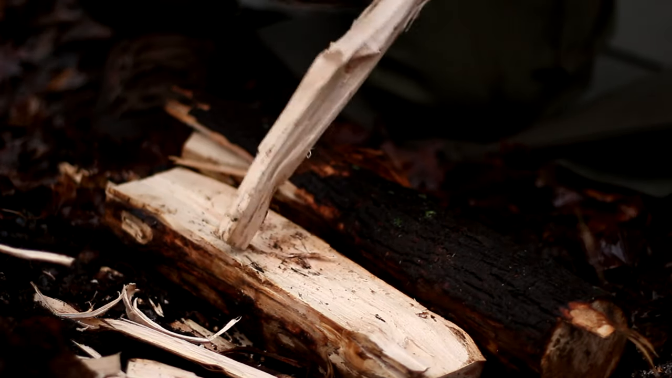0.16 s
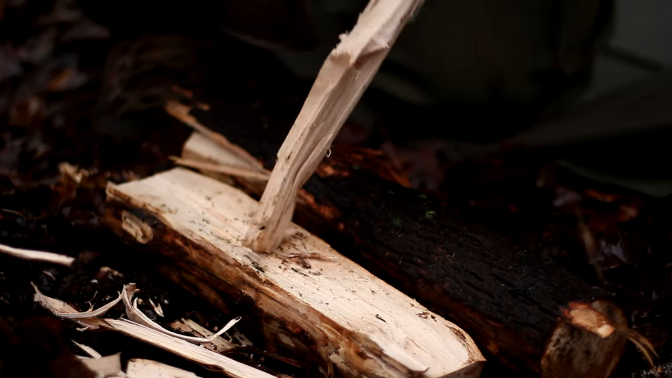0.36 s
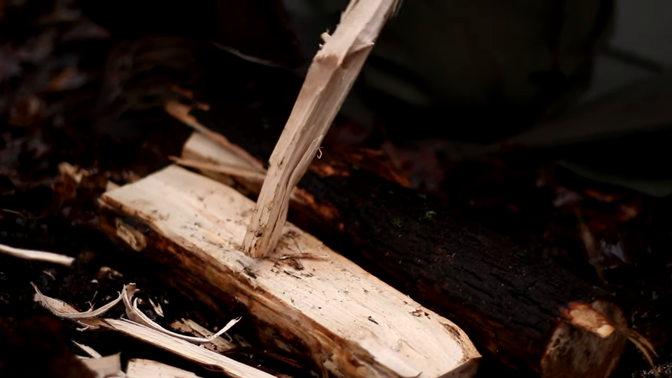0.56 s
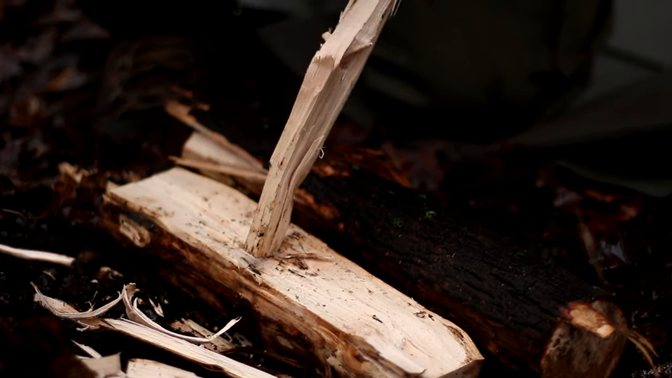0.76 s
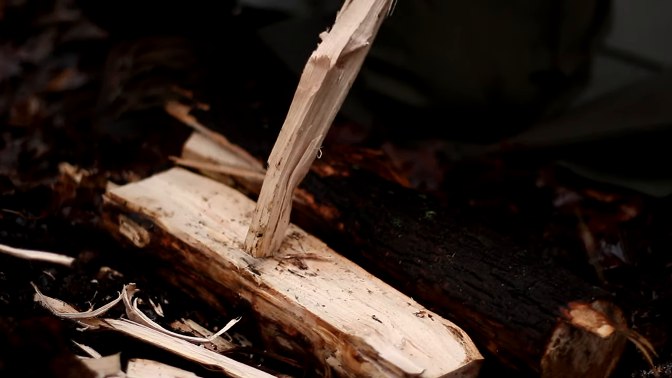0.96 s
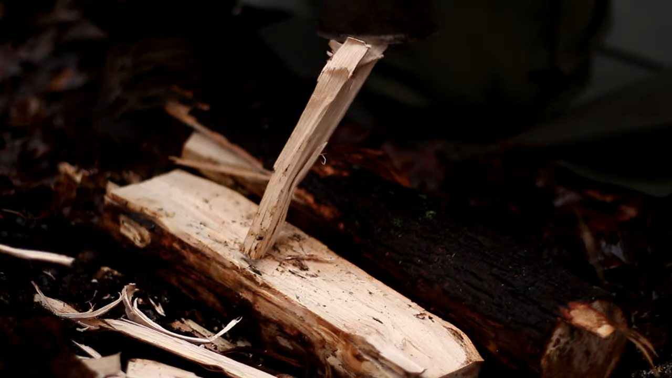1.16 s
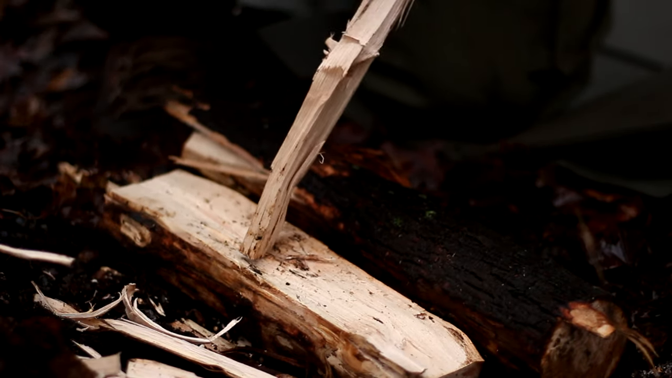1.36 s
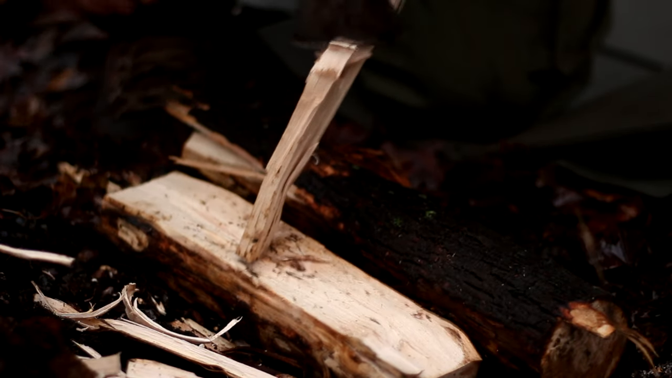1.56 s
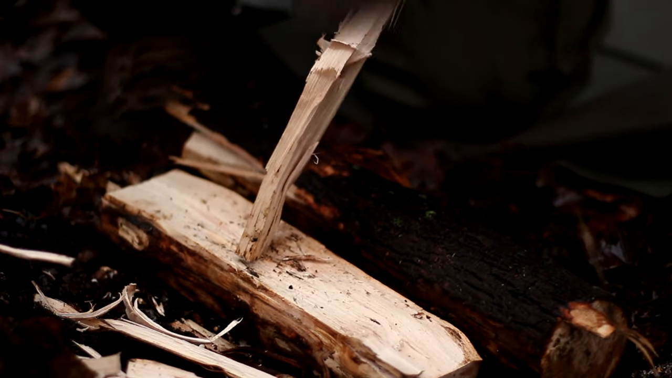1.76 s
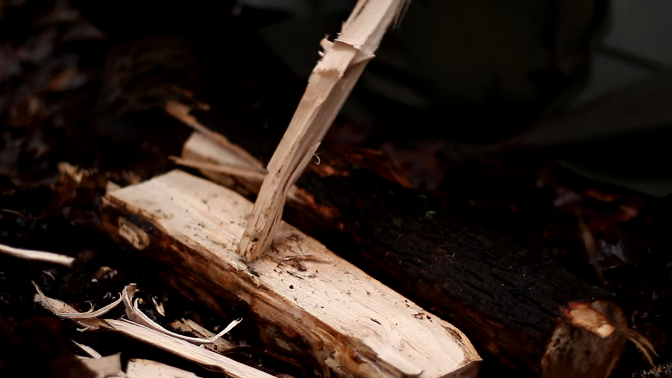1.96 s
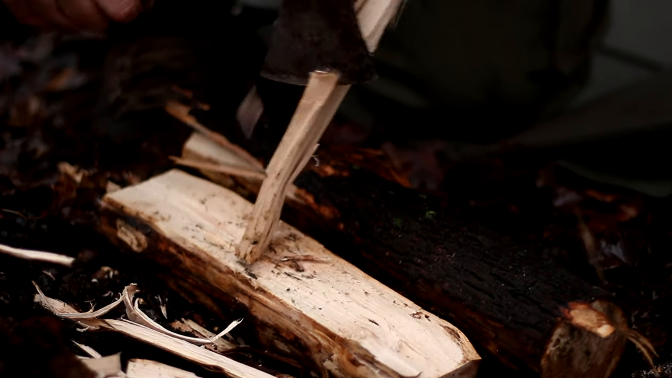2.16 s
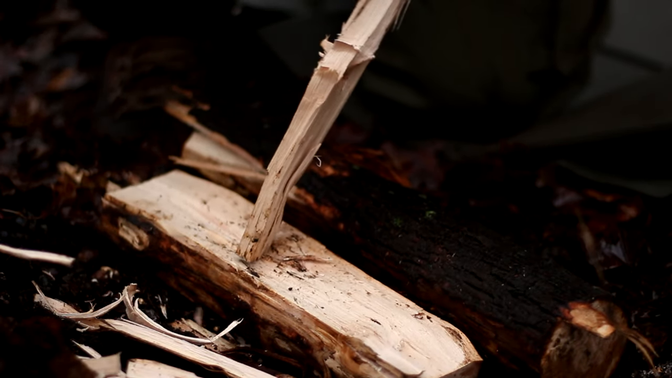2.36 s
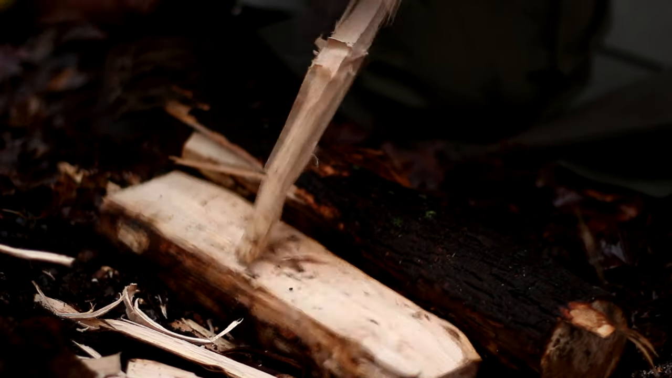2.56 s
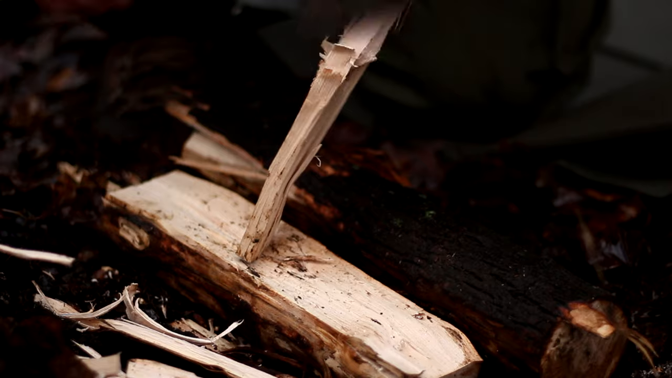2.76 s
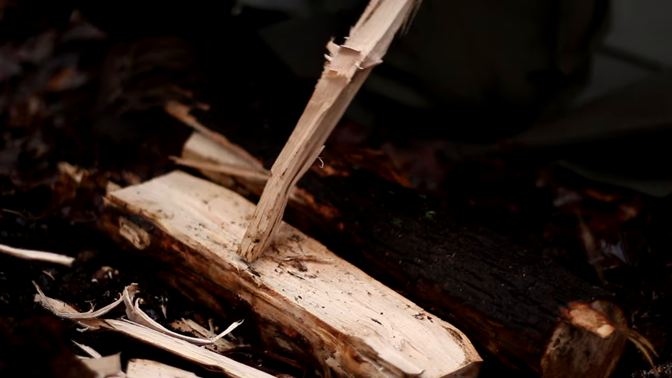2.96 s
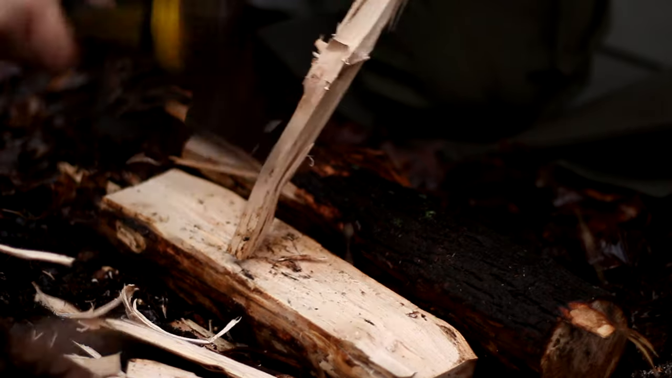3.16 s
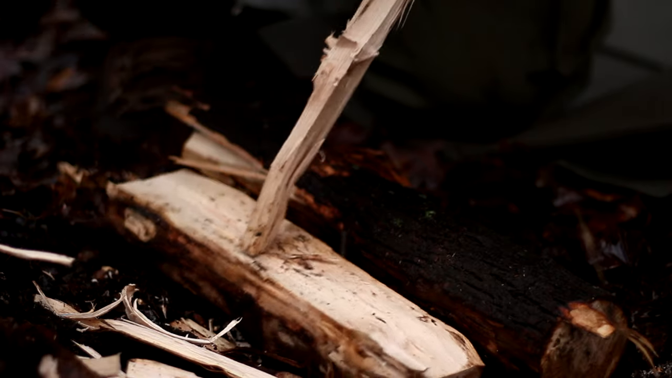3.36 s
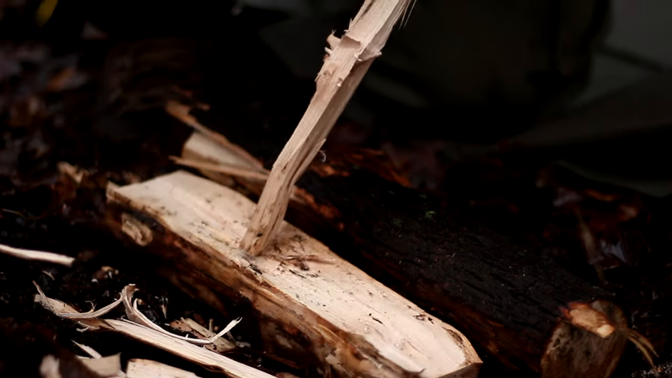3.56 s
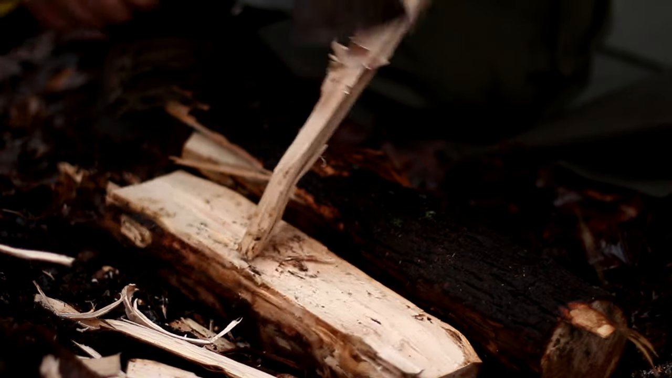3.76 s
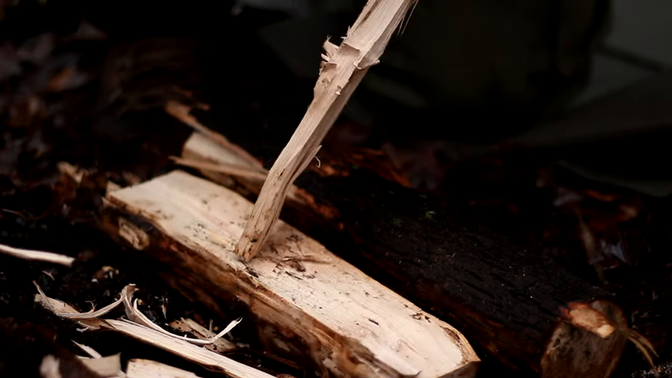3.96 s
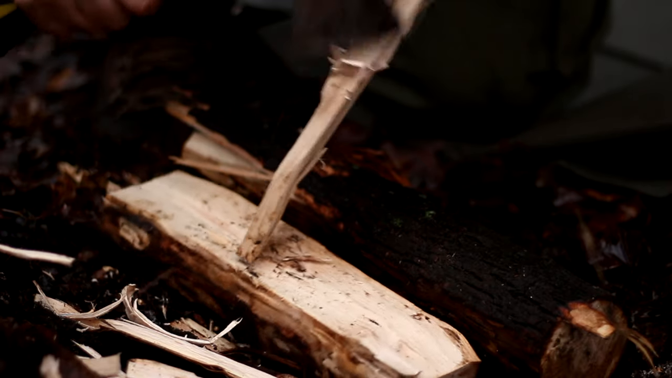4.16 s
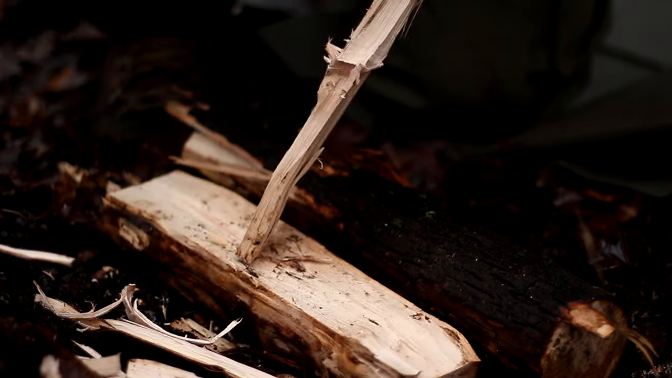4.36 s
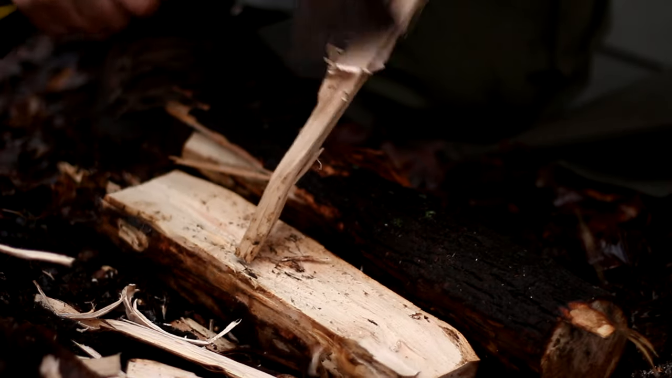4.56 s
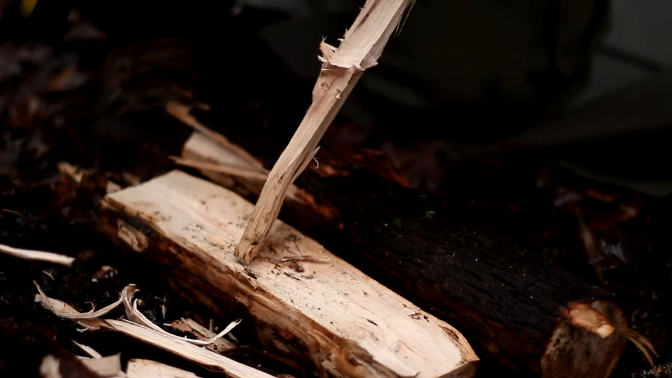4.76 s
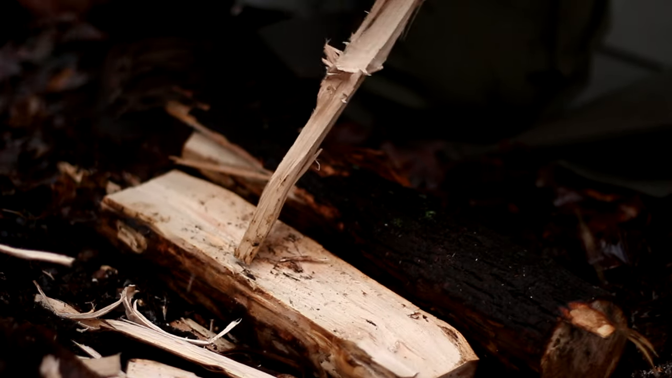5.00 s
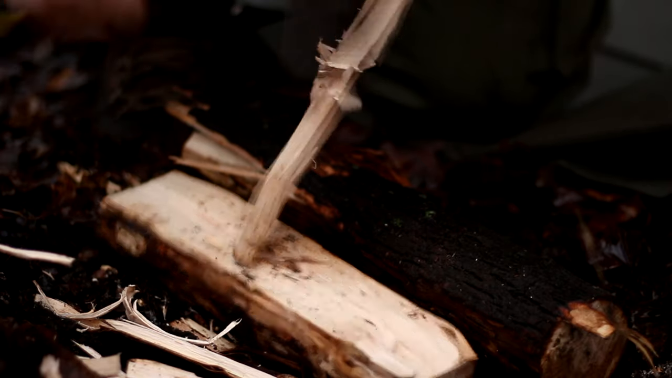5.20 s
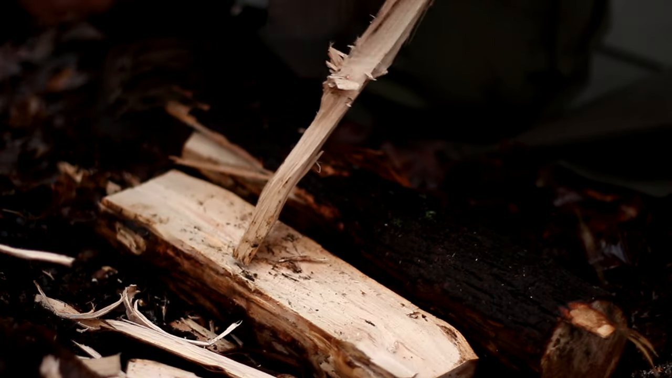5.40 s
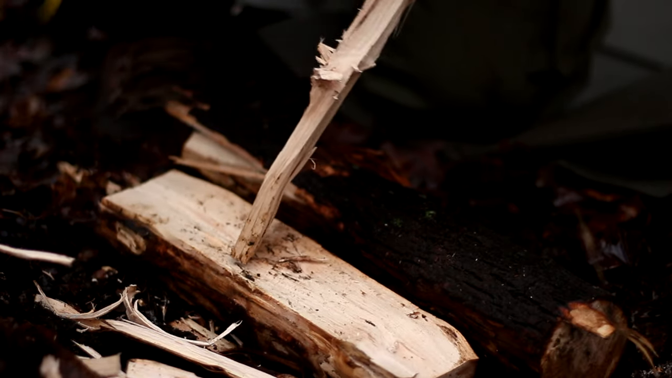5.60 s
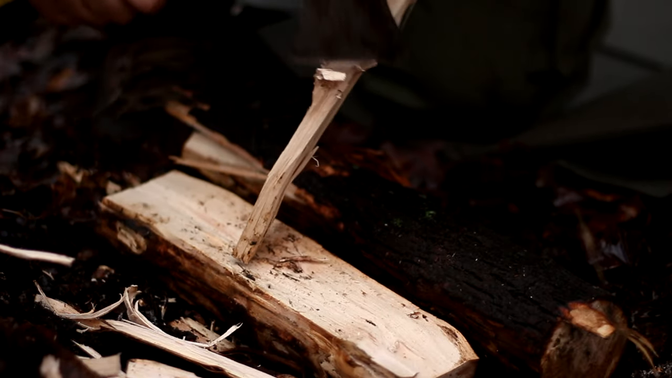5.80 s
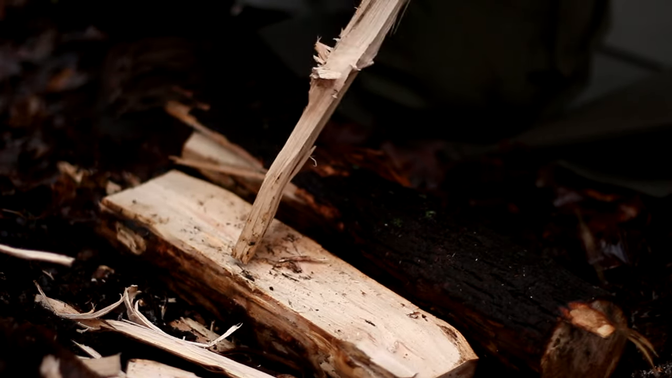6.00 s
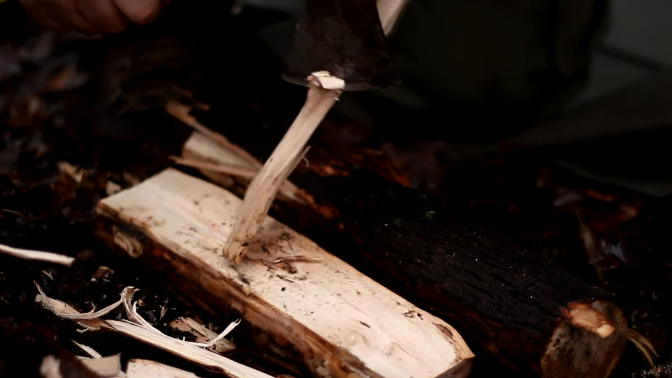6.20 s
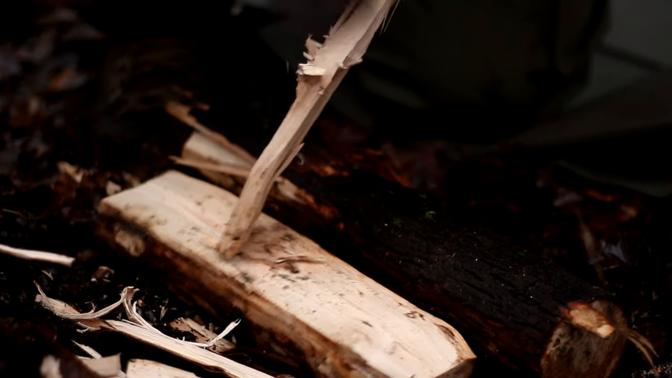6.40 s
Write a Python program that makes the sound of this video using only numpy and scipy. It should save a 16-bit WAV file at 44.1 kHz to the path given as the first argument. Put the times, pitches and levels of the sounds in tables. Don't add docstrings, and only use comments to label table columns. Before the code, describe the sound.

Close outdoor wood chopping: the tail of an earlier blow fades under a faint cloth rustle, then steady hatchet blows run to the end. Each is a hard woody crack with tearing splinters, a tiny bright blade ring and a dull log thump. Small ticks, rasps and one clattering chip fill the gaps over distant traffic rumble and light hiss. The loud hits clip and duck, with little reverberation.

```python
import sys
import numpy as np
from scipy import signal
from scipy.fft import rfft, irfft, next_fast_len
from scipy.io import wavfile
from scipy.ndimage import map_coordinates

SR = 44100
rng = np.random.default_rng(int(sys.argv[2]) if len(sys.argv) > 2 else 0)


def generate_wav(sig):
    pcm = np.round(np.clip(np.atleast_2d(sig).T, -1, 1) * 32767).astype(np.int16)
    wavfile.write(sys.argv[1], SR, pcm)


def undo_db(level):
    steps = np.asarray(level, float) / 20
    return 10 ** steps


N = 284004

# freq_hz, density_db_per_hz
RUMBLE_SPECTRUM = [(12, -34.5), (20, -0.5), (86, 3.5), (123, -7.5), (160, -8.5), (225, -17.5), (285, -25),
                   (311, -29.5), (400, -34), (520, -49.5), (880, -120)]
# freq_hz, density_db_per_hz
AIR_SPECTRUM = [(120, -23.5), (200, -7), (528, -11), (650, -12.5), (968, -17), (1150, -13.5), (2360, -18),
                (9000, -25), (11700, -44.5), (19800, -120)]
# middle_s, half_length_s, level_db
SOFT_SWELLS = [
    (0.051, .12, -52.5),
    (.86, .14, -60),
    (1.092, .03, -55),
    (3.38, .16, -59),
    (3.681, .014, -53),
    (5.597, 1.3, -63),
]
# freq_hz, density_db_per_hz
CLOTH_SPECTRUM = [(240, -51.5), (400, -27), (457, -10.5), (683, -8), (962, -15.5), (1690, -10.5),
                  (14000, -23)]
# level_under_blow_db, t60_s
TRUNK_DECAYS = [(-28.5, 0.24), (-43.5, 0.72)]
# freq_hz, density_db_per_hz
TRUNK_SPECTRUM = [(150, -20), (600, -11), (1200, -2), (1600, -3.5), (1900, 0.5), (2300, -3.5), (3100, -4),
                  (3500, -1.5), (4000, -3), (4900, -6.5), (5800, -6), (6750, -7), (8000, -9), (16000, -22)]
# start_s, peak_db,
# pitch_hz
SPLINTER_TICKS = [(.36, -49.5, 4500), (.684, -42.5, 3460), (.73, -51, 7930), (.936, -53, 8500),
                  (1.289, -43, 10200), (1.888, -50, 8760), (2.338, -38.5, 10030), (2.377, -37.5, 9800),
                  (2.478, -44, 4500), (2.87, -55, 13000), (3.465, -47, 8000), (3.471, -48, 8000),
                  (3.684, -40, 4500), (3.7079, -6, 6000), (3.839, -34, 6600), (4.188, -30.5, 9900),
                  (4.28, -46.5, 9600), (5.381, -35, 12500)]
# start_s, peak_db, pitch_hz
BLADE_RASPS = [(1.836, -38, 11500), (2.348, -44.5, 4000), (2.358, -39.5, 11000), (2.363, -41.5, 4500),
               (3.151, -25, 3480), (3.248, -51, 12100), (3.296, -43, 3020), (3.302, -47, 9000),
               (3.666, -44, 3980), (3.675, -45, 4500), (3.801, -38, 6700), (4.218, -35, 8900),
               (4.23, -41.5, 10000), (4.622, -34, 8400), (4.635, -38, 7750), (4.995, -37, 8100),
               (5.009, -41, 10000), (5.392, -31.5, 11500), (5.4, -43, 12000), (5.841, -41, 9000),
               (5.855, -44, 11000)]
# start_s, level_db
BLADE_PINGS = [
    (1.823, -46),
    (1.834, -45),
    (2.348, -42),
    (2.362, -40),
    (3.165, -39),
    (4.23, -43),
    (4.635, -55),
    (5.009, -54),
    (5.396, -48),
]
BLOW_S = [1.1008, 1.6394, 2.1479, 2.6584, 3.1235, 3.7085, 4.1282, 4.5423, 4.9178, 5.3045, 5.742, 6.155]
# knock_db, knock_hz, log_body_db, thump_db
BLOWS = [(1, 1410, -16, -26.5), (-0.5, 1260, -29, -22), (1.5, 1540, -30, -28.5), (0, 1300, -13, -24.5),
         (-2, 1620, -26.5, -25.5), (-16, 2400, -8, -25), (3, 1430, -20, -26), (1, 1400, -23, -25),
         (2, 1410, -16, -24.5), (-0.5, 1460, -10, -22), (4.5, 1815, -34, -21.5), (0.5, 1380, -31, -21)]
# freq_hz, level_db, t60_s
STICK_MODES = [(1900, -9.5, 0.05), (1240, -12, 0.045), (2300, -12.5, 0.023)]
# freq_hz, level_db, t60_s, arrival_s
LOG_MODES = [(86.6, 1, 0.085, 0.0027), (53, -19.5, 0.21, 0.021), (147.4, -7.5, 0.062, 0.00058),
             (221.8, -4, 0.045, 0.00052)]
# strongest_colour_hz, fibre_burst_db, slow_tearing_db
CRACKS = [(3700, -4.5, -5.5), (4160, -5.5, -4), (5450, -16.5, -3.5), (5134, -9.5, -5), (5040, -6.5, -2.5),
          (5000, -9, -2), (6000, -8, -5), (4920, -4, -2), (5500, -0.5, -0.5), (5200, -9.5, -5),
          (5000, -5, -1.5), (4500, -4, -2)]
# freq_hz, width_hz, level_db
BLADE_MODES = [(3585, 390, -4), (5005, 440, -1), (5640, 450, -4), (6970, 99, -1.5), (8620, 1100, -1.5),
               (9470, 63, 1), (10510, 220, 7.5), (12500, 170, 3), (14680, 520, -25.5)]
# freq_hz, density_db_per_hz
SPLINTER_SPECTRUM = [(300, -33), (700, -14), (1480, -2.5), (1950, -2), (2700, -11), (3500, -6),
                     (7000, -8.5), (16000, -21)]
# start_s, level_db
BARK_TOUCHES = [
    (2.1467, -26),
    (3.1222, -15),
    (3.7062, -26),
    (4.1268, -28),
    (5.303, -24),
    (5.7408, -34),
]
# start_s, peak_db, pitch_hz
FIBRE_SNAPS = [(1.107, -6, 2196), (1.1123, -7, 2130), (1.822, -45.5, 1660), (2.1535, -9.5, 6500),
               (2.1551, -5.5, 7980), (2.6613, -1.5, 1800), (2.6628, -6, 6870), (2.6725, -9.5, 2300),
               (2.676, -16, 2500), (2.682, -18.5, 2100), (3.128, -13, 9300), (3.1398, -16, 10800),
               (3.1507, -24.5, 7000), (3.152, -16, 2580), (3.671, -43, 1950), (3.679, -41, 1900),
               (3.688, -37, 480), (3.7107, 0, 3350), (3.72, -10.5, 1990), (4.1313, -9, 1900),
               (4.601, -37, 2110), (5.361, -34.5, 2000), (5.749, -8.5, 2000), (6.1589, -2.5, 392)]
# start_s, level_db
CHIP_LANDINGS = [
    (3.1752, 2.5),
    (3.689, -38),
]
# freq_hz, level_db, t60_s
CHIP_MODES = [(480, -7, 0.0087), (747, 4.5, 0.0097), (1140, 1.5, 0.012), (1820, -3.5, 0.02),
              (3000, -16, .012), (3700, -22, .012)]
# freq_hz, density_db_per_hz
HISS_SPECTRUM = [(20, 0.5), (100, 4), (400, 0), (15000, -1)]

RUMBLE_DB, AIR_DB, HISS_DB = -50, -61, -57.5
DRONE_DB, DRONE_FADE_DB_PER_S = -58.5, -1.5
EARLIER_BLOW_S, EARLIER_BLOW_DB = .1, -8.5
TICK_T60_S, TICK_RISE_S = 0.0073, 0.00014
RASP_T60_S, RASP_RISE_S = 0.029, 0.0016
CRACK_LAG_S = .0011
SNAP_CYCLES, SNAP_CYCLES_POWER = 8.2, 0.75
CHIP_RISE_S = .0005


def unit(x):
    return x / np.sqrt(np.mean(x ** 2) + 1e-20)


def along(points, hz):
    f, v = np.transpose(points)
    return np.interp(np.log(hz + 1), np.log(f + 1), v)


def noise(spectrum, size):
    m = next_fast_len(size + 2048)
    gain = undo_db(along(spectrum, np.fft.rfftfreq(m, 1 / SR)))
    return unit(irfft(rfft(rng.standard_normal(m)) * gain, m)[:size])


def wobble(rate_hz, size):
    knots = rng.standard_normal(int(size * rate_hz / SR) + 4)
    return map_coordinates(knots, [np.arange(size) * rate_hz / SR])


def tone(hz):
    return np.sin(2 * np.pi * np.cumsum(hz) / SR)


def ring(t, hz, db, t60_s, attack_s=.0001):
    t = np.maximum(t, 0)
    return undo_db(db - 60 * t / t60_s) * np.sin(2 * np.pi * hz * t) * (1 - np.exp(-t / attack_s))


def thin(x, low_hz):
    return signal.sosfilt(signal.butter(2, low_hz, "high", fs=SR, output="sos"), x)


def add(track, start_s, sound):
    track[round(start_s * SR):][:len(sound)] += sound


def background():
    t = np.arange(N) / SR
    rumble = undo_db(RUMBLE_DB + 1.5 * wobble(2.8, N)) * noise(RUMBLE_SPECTRUM, N)
    drone_db = DRONE_DB + DRONE_FADE_DB_PER_S * t + 1.3 * wobble(2.8, N)
    drone = undo_db(drone_db) * np.sqrt(2) * tone(157 + 1.2 * wobble(3.8, N))
    whine = undo_db(-72) * tone(640 + 5 * wobble(9.47, N)) * (t < 1.1)
    moves = sum(undo_db(db) * np.sqrt(np.clip(1 - ((t - middle_s) / half_s) ** 2, 0, 1))
                for middle_s, half_s, db in SOFT_SWELLS)
    sleeve = moves * undo_db(0.58 * wobble(60, N)) * noise(CLOTH_SPECTRUM, N)
    air = undo_db(AIR_DB + 0.37 * wobble(1.4, N)) * noise(AIR_SPECTRUM, N)
    return rumble + drone + whine + sleeve + air


def trunks():
    out, t = np.zeros(N + SR), np.arange(int(.7 * SR)) / SR
    wash = sum(undo_db(db - 60 * t / t60_s) for db, t60_s in TRUNK_DECAYS) * (1 - np.exp(-t / 0.002))
    earlier = undo_db(EARLIER_BLOW_DB) * wash * noise(TRUNK_SPECTRUM, len(t))
    add(out, 0, earlier[round(EARLIER_BLOW_S * SR):])
    for start_s, (knock_db, *_) in zip(BLOW_S, BLOWS):
        scatter = undo_db(0.35 * knock_db) * wash * noise(TRUNK_SPECTRUM, len(t))
        slap = ring(t - .057, 1770, knock_db - 42, 0.039)
        add(out, start_s, scatter + slap)
    return out[:N]


def ticks():
    out, t = np.zeros(N + SR), np.arange(SR // 8) / SR
    kinds = ((SPLINTER_TICKS, TICK_T60_S, TICK_RISE_S), (BLADE_RASPS, RASP_T60_S, RASP_RISE_S))
    for events, t60_s, rise_s in kinds:
        for start_s, db, hz in events:
            grit = noise([(hz / 3, -24), (hz / 1.72, -2), (hz * 0.9, -2), (hz * 2.3, -14)], len(t))
            add(out, start_s, undo_db(db + 5 - 60 * t / t60_s) * (1 - np.exp(-t / rise_s)) * grit)
    for start_s, db in BLADE_PINGS:
        add(out, start_s, ring(t, 6750, db, 0.096, 0.0053))
    return out[:N]


def chops():
    out, t = np.zeros(N + SR), np.arange(SR // 4) / SR
    for start_s, (knock_db, knock_hz, body_db, thump_db) in zip(BLOW_S, BLOWS):
        stick_detune = 1 + .04 * rng.standard_normal(len(STICK_MODES))
        log_detune = 1 + .04 * rng.standard_normal(len(LOG_MODES))
        knock = ring(t, knock_hz, knock_db + 1.5, 0.0075, .00005)
        body = ring(t, 680, body_db, 0.0092, 0.00089)
        stick = sum(ring(t - .001, hz * detune, knock_db + db, t60_s, 0.0016)
                    for (hz, db, t60_s), detune in zip(STICK_MODES, stick_detune))
        thump = sum(-ring(t - wait_s, hz * detune, thump_db + db + 20.5, t60_s, 0.0013)
                    for (hz, db, t60_s, wait_s), detune in zip(LOG_MODES, log_detune))
        add(out, start_s, thin(knock + body + stick, low_hz=576) + thump)
    return out[:N]


def cracks():
    out, t = np.zeros(N + SR), np.arange(SR // 8) / SR
    burst, crackle = undo_db(-60 * t / .012), undo_db(-60 * t / .06)
    for start_s, (colour_hz, burst_db, tear_db) in zip(BLOW_S, CRACKS):
        chance = rng.standard_normal((len(BLADE_MODES), 3)) * [.02, 2, .0001]
        steel = np.zeros(len(t))
        for (hz, _, db), (bend, more_db, late_s) in zip(BLADE_MODES, chance):
            mode_db = db + more_db - 3 * np.log2(hz / colour_hz) ** 2
            t60_s = .011 * (5000 / hz) ** 1.2
            steel += ring(t - abs(late_s), hz * (1 + bend), mode_db, t60_s)
        clumps = undo_db(3 * wobble(800, len(t)))
        fade = undo_db(burst_db) * burst + undo_db(tear_db) * crackle
        fibres = fade * clumps * noise(SPLINTER_SPECTRUM, len(t))
        add(out, start_s + CRACK_LAG_S, steel + fibres)
    t = t[:round(.0015 * SR)]
    for start_s, db in BARK_TOUCHES:
        graze = noise([(1500, -30), (6000, 0), (14000, -3)], len(t))
        add(out, start_s, undo_db(db - 5) * np.sqrt(t / t[-1]) * graze)
    return out[:N]


def snaps():
    out, t = np.zeros(N + SR), np.arange(SR // 20) / SR
    for start_s, db, hz in FIBRE_SNAPS:
        cycles = SNAP_CYCLES * (hz / 2000) ** SNAP_CYCLES_POWER
        click = ring(t, hz, db + 6, 3 * cycles / hz, 0.14 / hz)
        grit = undo_db(db + 13.5 - 20 * t * hz / cycles) * noise([(hz / 3, -20), (hz, 0), (hz * 2, -6)], len(t))
        add(out, start_s, click + min(1, hz / 6000) * grit)
    for start_s, db in CHIP_LANDINGS:
        chip = sum(ring(t, hz, db + mode_db, t60_s, CHIP_RISE_S) for hz, mode_db, t60_s in CHIP_MODES)
        scuff_db = db - 28 - 60 * t / 0.086 + 2.5 * wobble(600, len(t))
        add(out, start_s, chip + undo_db(scuff_db) * noise(SPLINTER_SPECTRUM, len(t)))
    return thin(out[:N], low_hz=353)


def scene():
    mono = background() + trunks() + ticks() + chops() + cracks() + snaps()
    return np.array([mono, mono])


def low_pass(x):
    return signal.sosfilt(signal.butter(12, 17070, fs=SR, output="sos"), x)


def record(dry):
    live = dry + undo_db(HISS_DB) * np.array([noise(HISS_SPECTRUM, N), noise(HISS_SPECTRUM, N)])
    level_db = 20 * np.log10(np.abs(thin(dry[0], low_hz=2200)) + 1e-9)
    over_db = np.clip(3 * (level_db + 4), 0, 21)
    release_db = 190 * np.arange(N) / SR
    held_db = np.maximum(np.maximum.accumulate(over_db + release_db) - release_db, 0)
    keep = np.exp(-1 / (0.0023 * SR))
    live = live * undo_db(-signal.lfilter([1 - keep], [1, -keep], held_db))
    clipped = live / (1 + np.abs(live / .74) ** 16) ** (1 / 16)
    m = next_fast_len(N)
    top_edge = [(15800, -0.5), (16200, -14.5), (16500, -40), (17000, -24.0), (17300, -87)]  # freq_hz, gain_db
    band = undo_db(along(top_edge, np.fft.rfftfreq(m, 1 / SR)))
    mix = irfft(rfft(clipped, m) * band, m)[:, :N]
    return low_pass(mix)


dry = scene()
out = record(dry)
generate_wav(out)
```